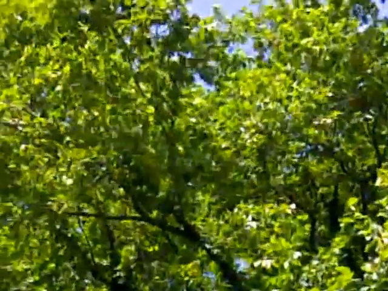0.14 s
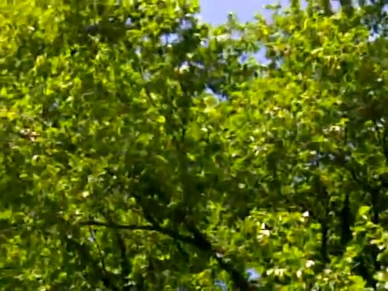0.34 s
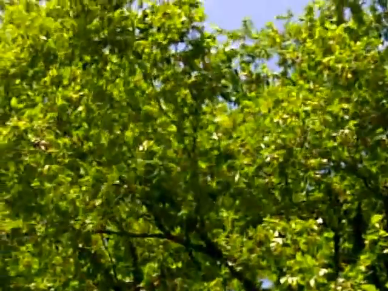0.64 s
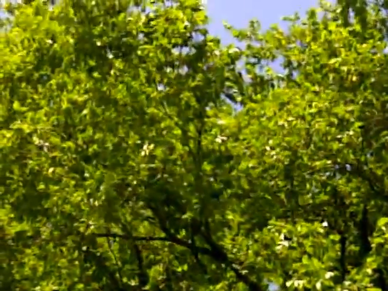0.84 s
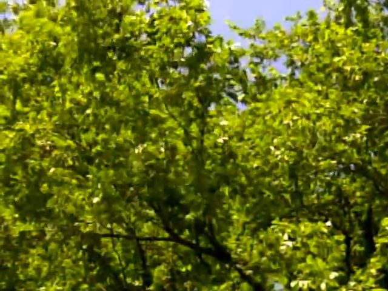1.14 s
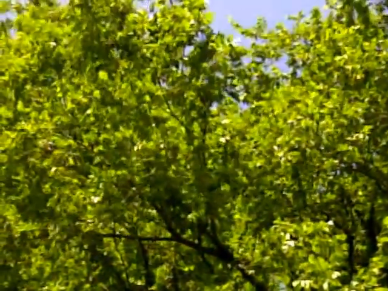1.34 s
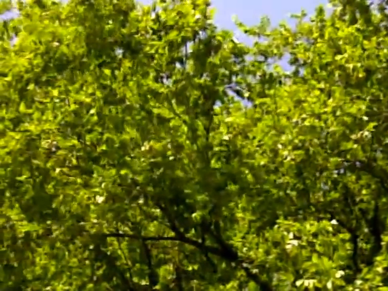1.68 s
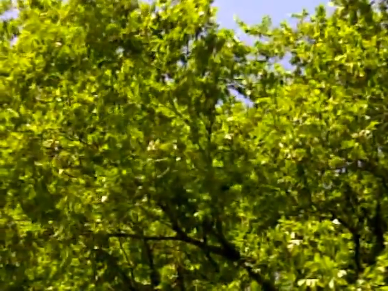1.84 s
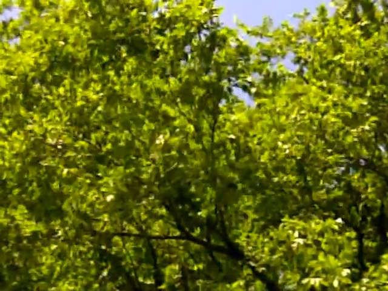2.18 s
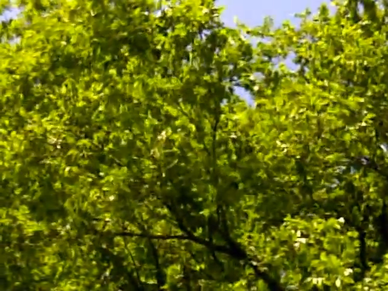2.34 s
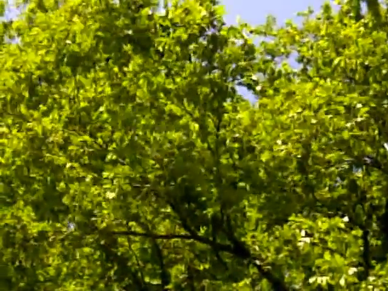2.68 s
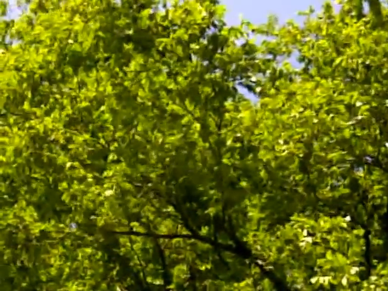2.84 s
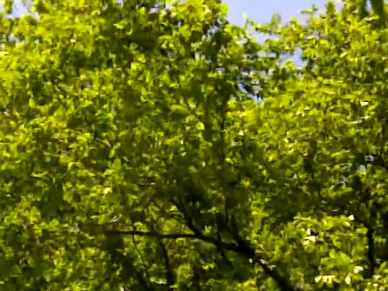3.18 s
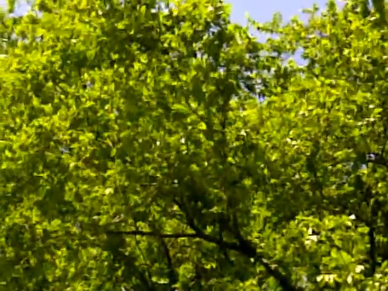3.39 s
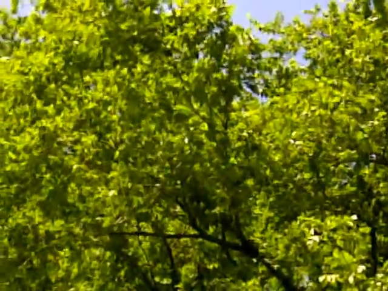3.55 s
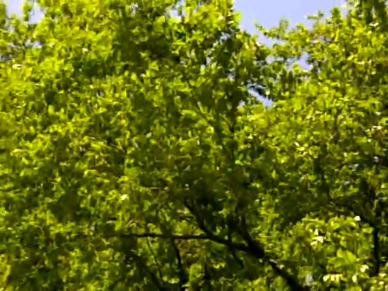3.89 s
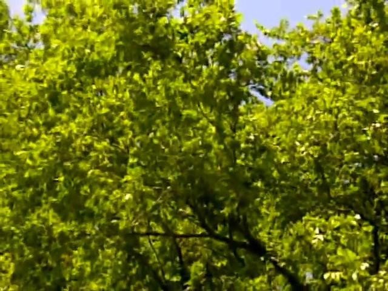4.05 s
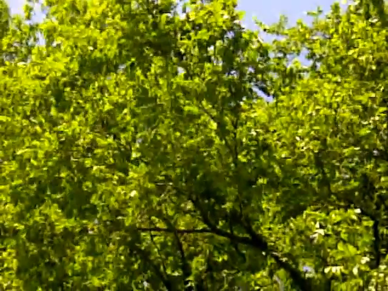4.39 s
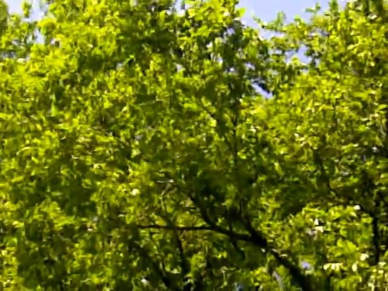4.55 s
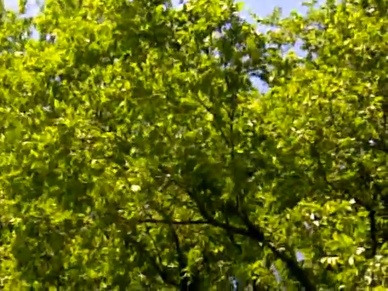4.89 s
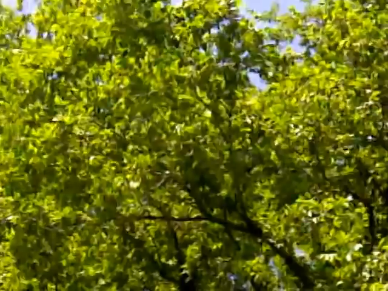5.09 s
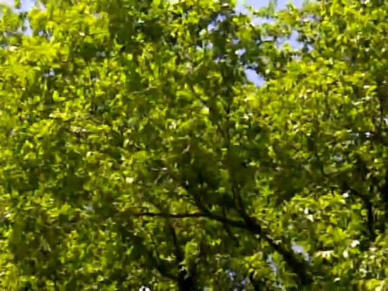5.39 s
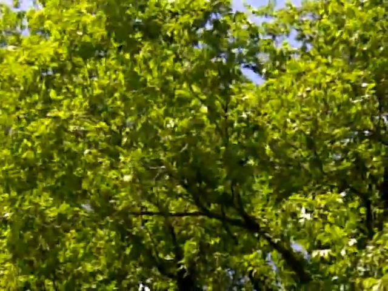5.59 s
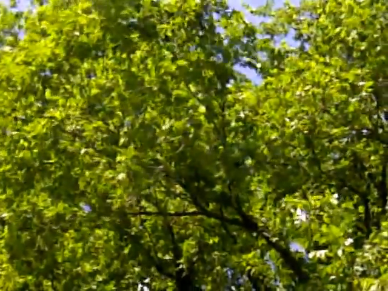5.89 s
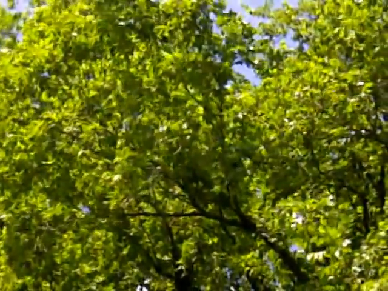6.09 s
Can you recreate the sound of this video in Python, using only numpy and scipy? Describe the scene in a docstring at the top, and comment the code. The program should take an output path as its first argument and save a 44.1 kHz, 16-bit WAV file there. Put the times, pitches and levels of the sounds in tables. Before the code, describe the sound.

Cicadas in nearby trees buzz and hiss in two slow swelling waves over a steady distant drone, with dull handling bumps on the camera.

```python
"""Periodical cicadas in near trees: tymbal click trains ring insect bodies, and a high buzz and a rasp swell in waves.
A distant chorus holds a steady drone: a narrow noise band of drifting pitch, plus a few wavering tones.
Bumps on the hand-held camera are damped casing modes and thuds, with one sharp tick and a soft band of rustle.
Faint gliding whistles, a low hum that dies away and an outdoor rush of shaped noise lie in the background.
One microphone feeds both channels, with nothing above 7.65 kHz."""
import sys
import numpy as np
from scipy import signal
from scipy.fft import rfft, irfft, next_fast_len
from scipy.io import wavfile
from scipy.ndimage import map_coordinates

SR = 44100
rng = np.random.default_rng(int(sys.argv[2]) if len(sys.argv) > 2 else 0)


def to_wav(sig):
    """Store sig (one row per channel, or 1-D mono) as 16-bit WAV at the path in sys.argv[1].

    Samples outside -1..1 are clipped; the rate is SR.
    """
    pcm = np.clip(np.atleast_2d(sig), -1, 1) * 32767
    pcm = np.round(pcm).astype(np.int16)
    wavfile.write(sys.argv[1], SR, pcm.T)  # frames by channels


N = 274743  # length [samples]


def amp(db):
    """Level to gain: 20 dB is a factor of ten in amplitude."""
    return 10 ** (np.asarray(db) / 20)


def unit(x):
    """Normalization: scale to an rms of 1."""
    return x / np.sqrt(np.mean(x ** 2) + 1e-20)


def wobble(rate):
    """Random modulation: a spline through Gaussian knots, rate of them a second."""
    knots = rng.standard_normal(int(N * rate / SR) + 4)
    return map_coordinates(knots, [np.arange(N) * rate / SR])


def swell(crest_s, rise_s, fall_s, hold_s=0):
    """Raised-cosine envelope: from 0 up to 1 at the crest, held there, and back to 0."""
    phase = np.interp(np.arange(N) / SR - crest_s, [-rise_s, 0, hold_s, hold_s + fall_s], [-1, 0, 0, 1])
    return .5 + .5 * np.cos(np.pi * phase)


def ramp(start_s, length_s):
    """Linear envelope: a rise from 0 to 1 that then holds."""
    return np.clip((np.arange(N) / SR - start_s) / length_s, 0, 1)


def filtered(x, response):
    """Linear filtering: multiply the spectrum by a response of frequency."""
    size = next_fast_len(len(x) + 8192)  # zero padding limits wrap-around
    hz = np.fft.rfftfreq(size, 1 / SR)
    return irfft(rfft(x, size) * response(hz), size)[:len(x)]


def coloured(x, points):
    """Spectral shaping: interpolate (frequency [Hz], level [dB]) on a log axis, at rms 1."""
    f, db = np.transpose(points)
    return unit(filtered(x, lambda hz: amp(np.interp(np.log(hz + 1), np.log(f), db))))


def add(track, s, sound):
    """Superposition: mix a sound into the track from time s [s]."""
    start = max(round(s * SR), 0)
    track[start:start + len(sound)] += sound[:max(N - start, 0)]


def foliage(x, t60, wet_db):
    """Diffuse scattering: leaves and trunks add a decaying noise tail to the direct sound."""
    t = np.arange(SR // 2) / SR
    tail = rng.standard_normal(len(t)) * amp(-60 * t / t60)
    scatter = signal.fftconvolve(x, tail / np.linalg.norm(tail))[:N]
    return x + amp(wet_db) * scatter


def cicada(click_hz, ring_t60, jitter, flutter_db):
    """Impulse excitation: tymbal ribs buckle in a fast uneven train and each click rings the body."""
    rate = click_hz * np.exp(.3 * rng.standard_normal())  # each insect has its own rate
    gaps = np.exp(jitter * rng.standard_normal(int(rate * N / SR * 2))) / rate
    at = (np.cumsum(gaps) * SR).astype(int)
    at = at[at < N]
    click_gains = amp(2 * rng.standard_normal(len(at)))
    clicks = np.bincount(at, click_gains, N)
    t = np.arange(SR // 100) / SR
    body = rng.standard_normal(len(t)) * amp(-60 * t / ring_t60)
    song = unit(signal.oaconvolve(clicks, body)[:N])
    return song * amp(flutter_db * wobble(26))


def chorus(click_hz, ring_t60, jitter, flutter_db, crowd_db, count):
    """Incoherent summation: a few near insects stand out of a crowd so dense that it merges into hiss."""
    near = sum(cicada(click_hz, ring_t60, jitter, flutter_db) for _ in range(count))
    return unit(foliage(near, t60=0.2, wet_db=-5.5)) + amp(crowd_db) * rng.standard_normal(N)


def near_trees():
    """Amplitude modulation: the buzz rides each wave, the rasp lags it, one close insect joins the second."""
    # spectra of buzz, rasp and the close insect's body: (frequency [Hz], relative level [dB])
    buzz_colour = [(1200, -59), (2400, -30.5), (3100, -22), (4000, -8), (4700, -1.54), (5300, 0.5),
                   (5850, 4), (6400, -0.5), (6850, -10.5), (7300, -21), (7600, -51.5)]
    rasp_colour = [(900, -43), (1900, -17), (2400, -16.5), (2750, -10), (3100, -6), (3550, -0.7),
                   (4400, 1.5), (5200, 1), (6200, -13.5), (7500, -48)]
    solo_colour = [(3500, -56.5), (4800, -15), (5150, -5), (5280, 3.5), (5550, -4), (5850, -11.5),
                   (7000, -39)]
    # waves of song: (buzz crest start [s], hold [s], buzz swell [dB], rasp swell [dB])
    waves = [(0.762, 0.26, 7.5, 8.5), (5.68, 0.28, 8, 8)]
    buzz_rest_db, buzz_rise_s, buzz_fall_s = -36, 1.55, 1.67  # rest levels lie between the waves
    rasp_rest_db, rasp_rise_s, rasp_fall_s = -48.5, 2.2, 2.12
    rasp_lag_s = 0.34  # the raspier singers crest later

    buzz = chorus(click_hz=259.5, ring_t60=.003, jitter=.16, flutter_db=2.0, crowd_db=3, count=28)
    rasp = chorus(click_hz=179.75, ring_t60=0.0042, jitter=.2, flutter_db=2.5, crowd_db=0.5, count=16)
    solo = cicada(click_hz=287.0, ring_t60=0.0027, jitter=0.13, flutter_db=5.5)
    solo = foliage(solo, t60=0.22, wet_db=-2.0)

    buzz_db = buzz_rest_db + 0.36 * wobble(32)
    rasp_db = rasp_rest_db
    for crest_s, hold_s, buzz_swell_db, rasp_swell_db in waves:
        buzz_db = buzz_db + buzz_swell_db * swell(crest_s, buzz_rise_s, buzz_fall_s, hold_s)
        rasp_db = rasp_db + rasp_swell_db * swell(crest_s + rasp_lag_s, rasp_rise_s, rasp_fall_s, hold_s)
    # the close insect starts quickly, then grows to its own crest
    solo_db = -41 + 6 * swell(crest_s=5.85, rise_s=.6, fall_s=.7)
    solo_gain = amp(solo_db) * ramp(start_s=4.7, length_s=0.23)

    return (coloured(buzz, buzz_colour) * amp(buzz_db)
            + coloured(rasp, rasp_colour) * amp(rasp_db)
            + coloured(solo, solo_colour) * solo_gain)


def far_drone(count=3):
    """Narrow-band noise: countless far insects blur into a drifting band; a few nearer ones hold a note."""
    # spectrum of the distant chorus: (frequency [Hz], relative level [dB])
    drone_colour = [(600, -45), (880, -22), (1000, -10), (1080, -3), (1140, 0), (1200, -6.5), (1290, -14.5),
                    (1480, -25.5), (2000, -56)]
    drone_db, drone_wander = -45.5, .004  # wander: rms share by which the pitch drifts, roughly
    lead_hz, lead_db, lead_waver_hz = 1147, -53.5, 10

    band = coloured(rng.standard_normal(N), drone_colour)
    # reading the noise at an uneven speed shifts its pitch
    place = np.cumsum(1 + drone_wander * wobble(4))
    drone = map_coordinates(band, [place], mode="mirror")
    leads = np.zeros(N)
    for _ in range(count):
        pitch = lead_hz + lead_waver_hz * unit(wobble(5) + wobble(70))
        leads += np.sin(2 * np.pi * np.cumsum(pitch) / SR)
    return drone * amp(drone_db) + unit(leads) * amp(lead_db)


def bumps(lead=0.0032, lead_db=-10):
    """Modal impact: a light first touch, then a casing click and one low, quickly damped swing."""
    # bumps on the camera: (time [s], thud gain [dB], thud frequency [Hz], thud t60 [s],
    #                       click gain [dB], click tilt about 1 kHz [dB per octave])
    bump_table = [(.134, -31.5, 215, 0.029, -59.5, 3), (.199, -31, 141, 0.028, -48, 0),
                  (.241, -35.5, 161, 0.026, -63, -1), (.5695, -31.5, 210, 0.026, -48.5, -5.5),
                  (1.997, -37.5, 95, .045, -67, 3), (4.334, -38.5, 179, 0.049, -71.5, -3),
                  (4.4, -25, 171, 0.035, -60, -1.5), (4.528, -29, 170, 0.028, -65, -4),
                  (4.7073, -14, 158, 0.065, -21.5, 0), (5.085, -33.5, 135, 0.04, -65, -2.5),
                  (5.344, -43.5, 72, 0.11, -71.5, 3), (5.518, -38.5, 165, 0.063, -67.5, 2)]
    # modes of the casing: (frequency [Hz], relative level [dB], t60 [s])
    casing = [(616, -2, 0.011), (975, 3.5, 0.0099), (1400, -22, 0.004), (2200, -20.5, 0.005),
              (3030, -14, 0.009)]
    rise_cycles = .42  # lower thuds come from softer contacts and build more slowly

    track, t = np.zeros(N), np.arange(SR // 5) / SR
    for s, thud_db, thud_hz, thud_t60, click_db, tilt_db in bump_table:
        click = np.zeros(len(t))
        for hz, db, t60 in casing:
            mode_db = db + tilt_db * np.log2(hz / 1000) + rng.normal(0, 1)
            click += amp(mode_db - 60 * t / t60) * np.sin(2 * np.pi * hz * t)
        click *= amp(click_db)
        onset = 1 - np.exp(-t * thud_hz / rise_cycles)
        swing = amp(thud_db - 60 * t / thud_t60) * onset * np.sin(2 * np.pi * thud_hz * t)
        thud = np.gradient(swing, 2 * np.pi * thud_hz / SR)  # the microphone hears the casing's speed
        add(track, s - lead, amp(lead_db) * click)
        add(track, s, thud - click)
    return track


def tick(attack=0.00017):
    """Modal ringing: a small hard part of the camera snaps and its modes die away in milliseconds."""
    # modes of that part: (frequency [Hz], relative level [dB], t60 [s])
    modes = [(424, -13.5, 0.013), (1230, -0.5, 0.01), (1580, -10, .009), (2050, -9, 0.012),
             (2420, -7.5, 0.0091), (2980, -10.5, .008)]
    track, t = np.zeros(N), np.arange(SR // 20) / SR
    ring = sum(amp(db - 60 * t / t60) * np.sin(2 * np.pi * hz * t) for hz, db, t60 in modes)
    add(track, .5696, amp(-24) * (1 - np.exp(-t / attack)) * ring)
    return track


def rustle():
    """Enveloped noise: a brief soft rustle swells and fades just before the hardest bump."""
    # spectrum of the rustle: (frequency [Hz], relative level [dB])
    rustle_colour = [(100, -6.5), (400, -4.5), (1000, -8), (1620, -0.5), (1950, -6), (4000, -22)]
    noise = coloured(rng.standard_normal(N), rustle_colour)
    return noise * amp(-53.5) * swell(crest_s=4.47, rise_s=.24, fall_s=0.25)


def whistles(waver_hz=14):
    """Frequency modulation: faint short notes glide and level off, blurred by scatter from the trees."""
    # far whistles: (time [s], length [s], start frequency [Hz], end frequency [Hz], crest level [dB])
    notes = [(1.665, 0.055, 1610, 1635, -61.5), (1.937, .13, 1750, 1725, -61),
             (2.06, .17, 1715, 1767, -69.5), (2.242, .22, 1355, 1448, -56.5)]
    track = np.zeros(N)
    for s, length, start_hz, end_hz, db in notes:
        u = np.linspace(0, 1, int(length * SR))
        glide = end_hz + (start_hz - end_hz) * (1 - u) ** 2
        pitch = glide + waver_hz * wobble(90)[:len(u)]
        tone = np.sqrt(2) * np.sin(2 * np.pi * np.cumsum(pitch) / SR)  # rms 1
        add(track, s, amp(db) * np.sin(np.pi * u) * tone)
    return foliage(track, t60=0.54, wet_db=-5.5)


def background():
    """Broadband noise and a tone: a soft outdoor rush, and an unsteady hum that holds, then dies away."""
    # spectrum of the outdoor rush: (frequency [Hz], relative level [dB])
    air_colour = [(15, -18.5), (40, -4), (80, 1.7), (170, 3.5), (300, -0.3), (560, -2), (630, -4), (750, 2),
                  (950, -7), (1600, -5.5), (2400, -8.5), (7000, -27)]
    hum_db, hum_end_s, hum_release_s = -64.7, 2.35, .35
    air = coloured(rng.standard_normal(N), air_colour) * amp(-55.5 + 0.51 * wobble(4))
    hum_hz = 215.3 + 1.1 * wobble(5.6)
    hum = unit(np.sin(2 * np.pi * np.cumsum(hum_hz) / SR))
    hum_release = 1 - ramp(hum_end_s - hum_release_s, hum_release_s)
    return air + hum * amp(hum_db + 1.2 * wobble(6.5)) * hum_release


def scene():
    """Superposition: all sources add at one microphone, heard alike in both ears."""
    mono = near_trees() + far_drone() + bumps() + tick() + rustle() + whistles() + background()
    return np.array([mono, mono])


def record(dry):
    """Band limiting: the camera keeps nothing at or above 7650 Hz."""
    return np.array([filtered(channel, lambda hz: hz < 7650) for channel in dry])


dry = scene()
out = record(dry)
to_wav(out)
```